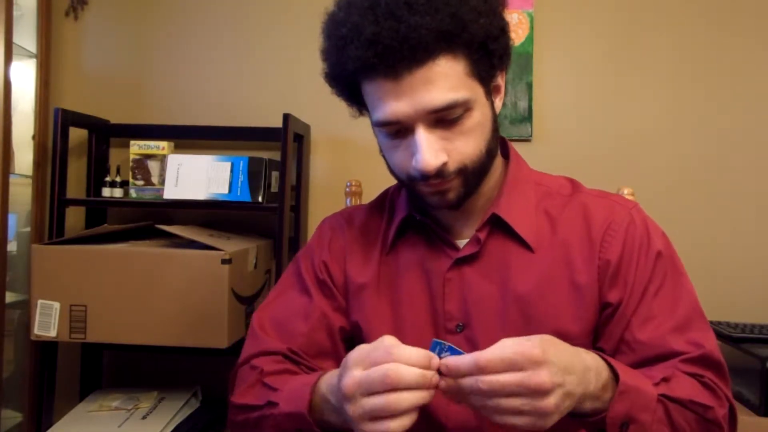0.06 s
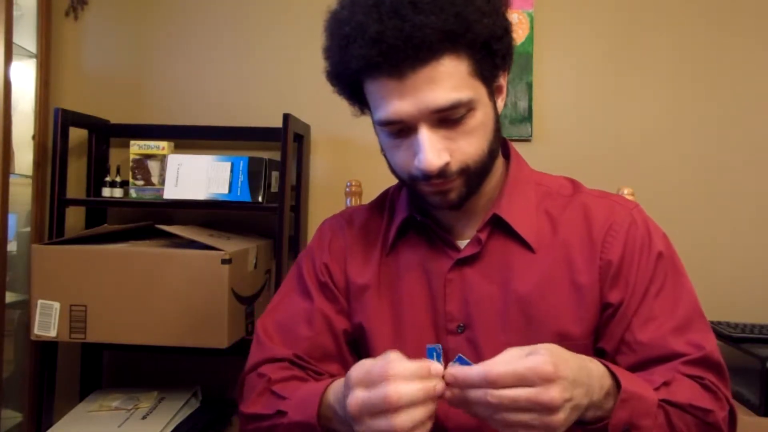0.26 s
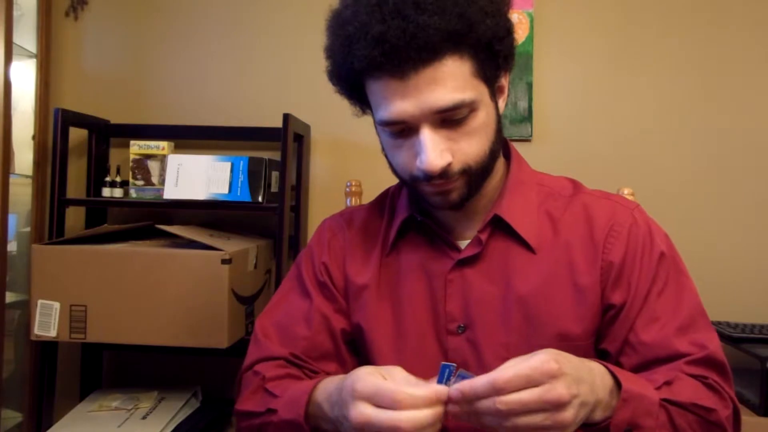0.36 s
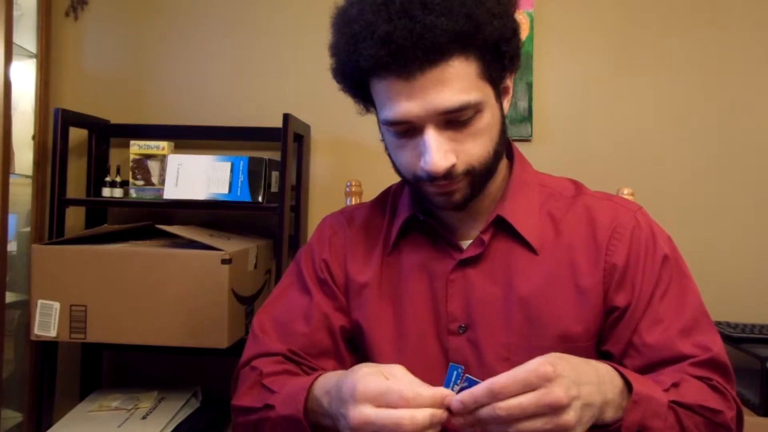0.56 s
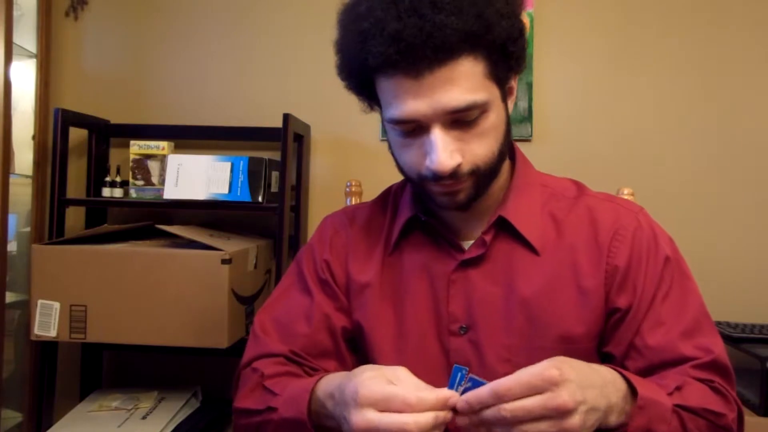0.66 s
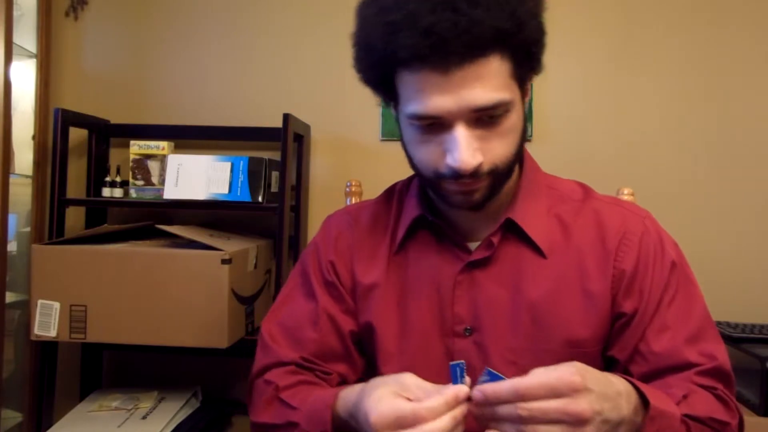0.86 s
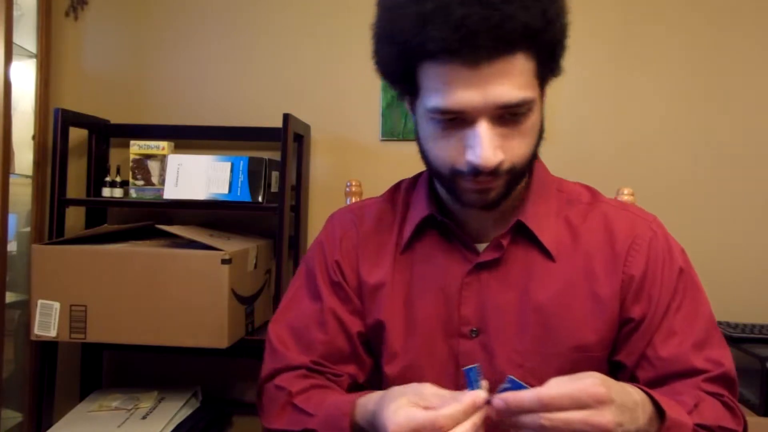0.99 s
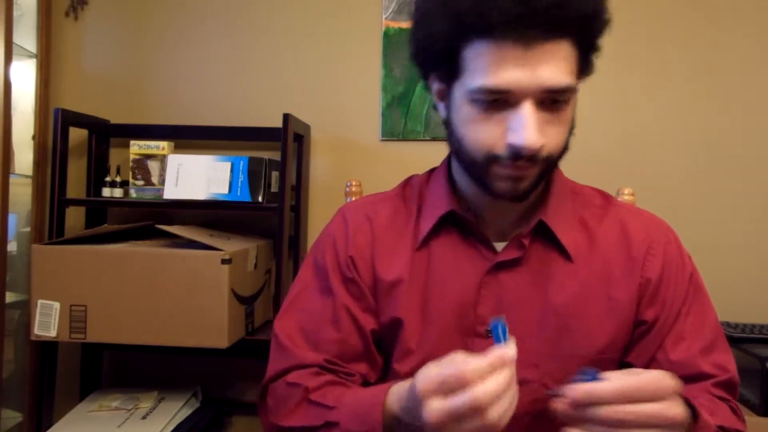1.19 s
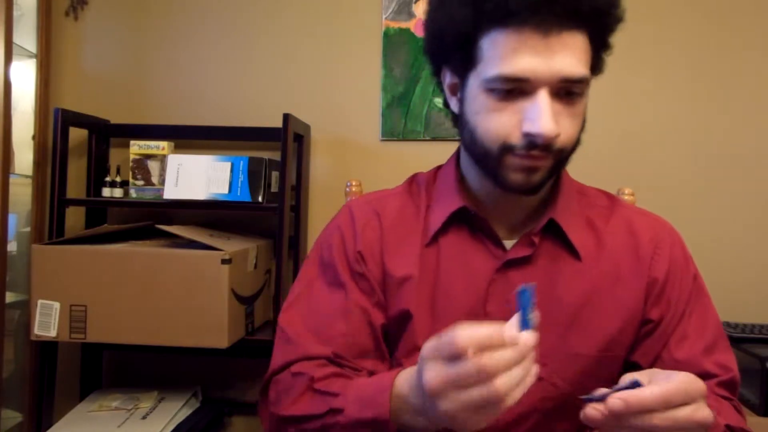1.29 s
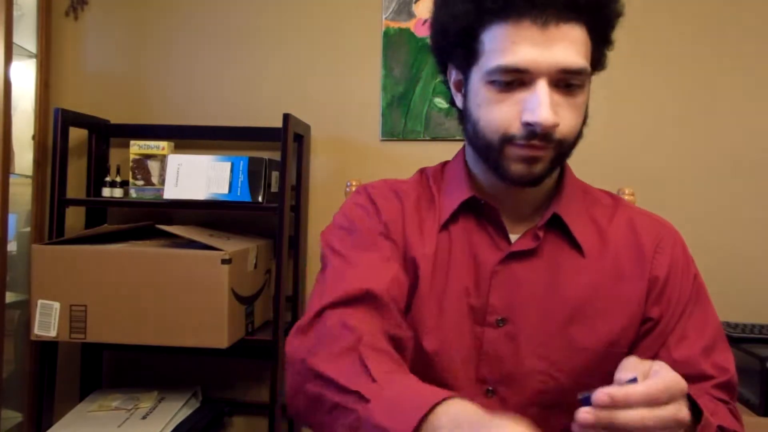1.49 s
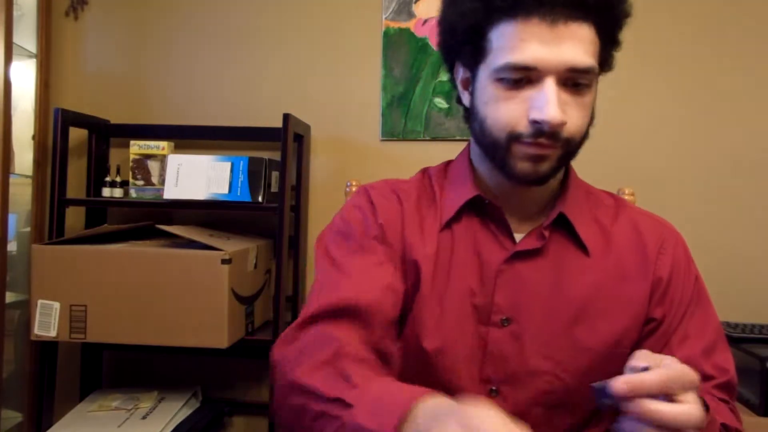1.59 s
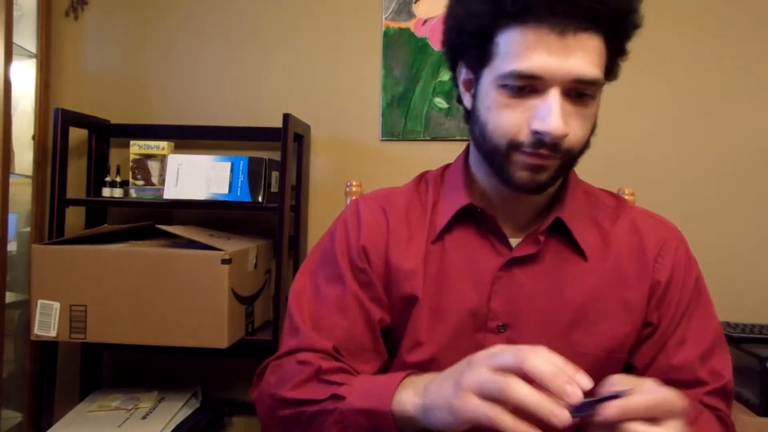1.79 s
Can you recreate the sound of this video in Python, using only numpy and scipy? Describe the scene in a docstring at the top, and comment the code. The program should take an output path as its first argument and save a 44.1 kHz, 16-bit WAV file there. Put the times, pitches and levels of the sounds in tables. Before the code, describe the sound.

One sharp paper snap, then two short crackly peels and a light put-down, quiet room

```python
"""A desk in a quiet room: small pieces of stiff paper are worked loose by hand, brighter in the right channel.
One piece snaps free loudly (ringing modes and early reflections); two short peels follow, each a run of cracks
(fibre bursts through three resonances) over tearing grains, and a piece is put down.
Fingers and sleeves rub (coloured grains under slow strokes), over a low hum and faint hiss (sines and noise)."""
import sys
import numpy as np
from scipy import signal
from scipy.fft import rfft, irfft
from scipy.io import wavfile
from scipy.ndimage import uniform_filter1d

SR = 44100
rng = np.random.default_rng(int(sys.argv[2]) if len(sys.argv) > 2 else 0)


def master(y):
    """Save y as 16-bit WAV."""
    cut = np.clip(np.atleast_2d(y).T, -1, 1)
    pcm = np.round(cut * 32767)  # scale
    wavfile.write(sys.argv[1], SR, pcm.astype(np.int16))


N = 81585
HZ = np.fft.rfftfreq(2048, 1 / SR)  # grid for colouring clicks


def amp(db):
    """Decibels to amplitude gain."""
    return 10 ** (np.asarray(db) / 20)


def unit(x):
    """Scales to rms 1."""
    return x / np.sqrt(np.mean(x ** 2) + 1e-20)


def read(points, hz):
    """Interpolates a table on a log-frequency axis."""
    f, value = np.transpose(points)
    return np.interp(np.log(hz + 1), np.log(f + 1), value)


def add(mix, start_s, sound):
    """Mixes a sound in at a time, cropped to the mix."""
    at = round(start_s * SR)
    sound = sound[max(-at, 0):]
    part = mix[max(at, 0):][:len(sound)]
    part += sound[:len(part)]


def click(gain):
    """Minimum-phase impulse with this magnitude spectrum."""
    both_sides = np.r_[gain, gain[-2:0:-1]]
    log_gain = np.log(np.maximum(both_sides, 1e-5))
    return np.fft.ifft(np.exp(np.conj(signal.hilbert(log_gain)))).real


def tint(x, points):
    """Filters causally by a (frequency [Hz], gain [dB]) table."""
    return signal.fftconvolve(x, click(amp(read(points, HZ))))[:len(x)]


def decorrelate(a, b, alike):
    """Two channels whose likeness is set per frequency."""
    return np.array([alike * a + np.sqrt(1 - alike ** 2) * b, a])


def ring(modes):
    """Dying sines with a very quick rise; high modes arrive first, neighbours swing opposite ways."""
    rise_s, treble_lead_s = 0.00023, 0.000405
    out = 0
    for k, (hz, db, t60_s) in enumerate(modes):
        delay_s = treble_lead_s * (1 - hz / 13000)
        t = np.maximum(np.arange(SR // 4) / SR - delay_s, 0)
        rise = 1 - np.exp(-(t / rise_s) ** 2)
        decay = amp(db - 60 * t / t60_s)
        out = out + (-1) ** k * rise * decay * np.sin(2 * np.pi * hz * t)
    return out


def fracture(scatter_s):
    """One main break and a quickly dying scatter of fibre breaks, evened out in colour."""
    scatter_db = 6  # all fibres together against the main break
    t = np.arange(400) / SR
    envelope = np.exp(-t / scatter_s) * (1 - np.exp(-2 * t / scatter_s))
    fibres = rng.standard_normal(len(t)) * envelope
    push = amp(scatter_db) * fibres / np.linalg.norm(fibres)
    push[0] = 1
    power = uniform_filter1d(abs(rfft(push, 2048)) ** 2, size=50)
    return np.convolve(push, click(1 / np.sqrt(power)))[:len(t)]


def friction(strokes, colour, grains_per_s=6000):
    """Dense grains of uneven size under strokes that swell and fade."""
    spread_db = 2
    sizes = amp(spread_db * np.minimum(rng.exponential(1, N), 4))
    hits = rng.random(N) < grains_per_s / SR
    grains = sizes * rng.standard_normal(N) * hits
    t = np.arange(N) / SR
    pressure = sum(amp(db) * np.sin(np.pi * np.clip((t - start_s) / length_s, 0, 1))
                   for start_s, length_s, db in strokes)
    return pressure * unit(tint(unit(grains), colour))


def air():
    """Room rumble and broadband hiss: shaped noise, partly shared between the channels."""
    # (frequency [Hz], relative density [dB])
    floor_colour = [(8.8, -54), (15, 10.5), (46, -8), (91, -9), (339, -16), (403, -16.5), (601, -18.5),
                    (898, -22), (978, -20.5), (1270, -23), (1380, -25), (1500, -24), (1780, -25),
                    (4460, -28), (14000, -32)]
    # (frequency [Hz], left-right likeness [0-1])
    floor_alike = [(30, 0.78), (120, 0.61), (500, 0.42), (1500, 0.27), (5000, 0.067), (14000, 0.038)]
    level_db, left_db = -56, 0.03
    hz = np.fft.rfftfreq(N, 1 / SR)
    a, b = rfft(rng.standard_normal((2, N)))
    alike = np.clip(read(floor_alike, hz), 0, 1)
    noise = irfft(decorrelate(a, b, alike) * amp(read(floor_colour, hz)), N)
    return amp(level_db) * unit(noise) * np.array([[amp(left_db)], [1]])


def hum():
    """Appliance hum: steady sines, each with its own slow level waver, equal in both channels."""
    # (frequency [Hz], rms level [dB])
    hum_lines = [(60, -69), (238, -73.5), (329, -78), (357, -71.5), (542, -81.5)]
    waver_depth, waver_hz = 0.47, 5
    hz, t = np.fft.rfftfreq(N, 1 / SR), np.arange(N) / SR
    out = 0
    for line_hz, db in hum_lines:
        slow_noise = rfft(rng.standard_normal(N)) * np.exp(-(hz / waver_hz) ** 2)
        waver = unit(irfft(slow_noise, N))
        tone = np.sin(2 * np.pi * (line_hz * t + rng.random()))
        out = out + amp(db) * unit((1 + waver_depth * waver) * tone)
    return out


def hiss():
    """Microphone hiss in a narrow band, independent in each channel."""
    centre_hz, width_hz, level_db = 13230, 760, -72.5
    hz = np.fft.rfftfreq(N, 1 / SR)
    band = np.exp(-((hz - centre_hz) / width_hz) ** 2)
    return amp(level_db) * unit(irfft(rfft(rng.standard_normal((2, N))) * band, N))


def room(x):
    """Quick reflections from desk and body, then a short furnished-room tail, more alike in the bass."""
    # (frequency [Hz], late decay T60 [s])
    late_t60 = [(200, .3), (600, 0.27), (1500, 0.36), (4700, 0.34), (8000, 0.15), (14000, .17)]
    # (frequency [Hz], gain [dB])
    tail_colour = [(150, -20.5), (580, -3), (850, -3), (1300, -7.5), (2700, -3), (4500, -10), (5400, -9.5),
                   (7200, -6.5), (10000, -5), (12000, -15.5), (14000, -9)]
    gap_s, early_t60_s, early_db = .0035, 0.13, 3
    alike_low, alike_high = 0.69, 0.53  # at 500 and 4000 Hz
    hz, t, (a, b) = signal.stft(rng.standard_normal((2, SR // 2)), SR, nperseg=256)
    alike = np.clip(read([(500, alike_low), (4000, alike_high)], hz), 0, 1)[:, None]
    late = amp(-60 * t / read(late_t60, hz)[:, None])
    early = amp(-60 * t / early_t60_s)
    fade = np.hypot(late, 2 * amp(early_db) * early)
    fade /= np.sqrt((fade ** 2).sum(1, keepdims=True) * t[1] * SR)  # same energy in every band
    tails = signal.istft(decorrelate(a, b, alike) * fade, SR, nperseg=256)[1]
    out = np.zeros((2, N))
    for channel, tail in zip(out, tails):
        add(channel, gap_s, signal.fftconvolve(x, tint(tail, tail_colour)))
    return out


def sleeves():
    """Shirt sleeves shifting: dull cloth friction."""
    # (start [s], length [s], level [dB])
    sleeve_strokes = [(-.08, 0.27, -59), (1.24, 0.3, -67.5), (1.56, 0.11, -59.5)]
    # (frequency [Hz], gain [dB])
    sleeve_colour = [(50, -17), (150, 7), (400, -7), (800, -8), (1500, -13), (4000, -19), (12000, -13)]
    return friction(sleeve_strokes, sleeve_colour)


def finger_rubs():
    """Fingertips sliding on paper: bright friction."""
    # (start [s], length [s], level [dB])
    rub_strokes = [(0, 0.48, -54.5), (.39, 0.14, -58), (.55, .12, -59.5), (.97, .11, -56.5),
                   (1.13, 0.18, -55.5), (1.41, .13, -54.5), (1.545, 0.055, -54.5), (1.62, 0.14, -52.5)]
    # (frequency [Hz], gain [dB])
    rub_colour = [(300, 5.5), (1500, -7.5), (3500, -8), (5500, 2), (7000, -5), (9000, -8), (11500, 2),
                  (14500, 5.5)]
    return friction(rub_strokes, rub_colour)


def set_down():
    """The piece settles on the desk: one short scrape."""
    # (start [s], length [s], level [dB])
    desk_strokes = [(1.644, 0.021, -53)]
    # (frequency [Hz], gain [dB])
    desk_colour = [(80, -8), (220, 4), (900, 5), (2000, 1), (3000, -25), (3900, 4), (6000, -13),
                   (13000, -11)]
    return friction(desk_strokes, desk_colour)


def peels():
    """Fibres tearing between the cracks: sparser, brighter grains."""
    # (start [s], length [s], level [dB])
    peel_strokes = [(.917, 0.043, -45.5), (.949, 0.018, -43), (1.199, .012, -45.5), (1.229, 0.012, -41.5)]
    # (frequency [Hz], gain [dB])
    peel_colour = [(300, -27), (1800, -14), (3500, -5), (5500, 2), (7500, 2), (9000, -8), (12000, 13),
                   (14500, -9.5)]
    return friction(peel_strokes, peel_colour, grains_per_s=2400)


def knocks():
    """The card knocks dully against fingers or desk, ringing a few low modes."""
    # (time [s], level [dB])
    knock_hits = [(.2016, -42), (.9139, -42.5), (.9264, -44.5), (.9408, -53), (0.9597, -56), (1.2049, -49),
                  (1.2325, -46), (1.6469, -43.5)]
    # (frequency [Hz], relative level [dB], T60 [s])
    knock_modes = [(232, -9, 0.034), (515, 3.5, 0.0095), (678, -0.5, 0.018)]
    out = np.zeros(N)
    for start_s, db in knock_hits:
        add(out, start_s, amp(db) * ring(knock_modes))
    return out


def cracks():
    """Each crack's fibre burst excites three broad resonances that shift with the grip."""
    # (time [s], scatter [s], body [Hz], body [dB], ring [Hz], ring [dB], top [Hz], top [dB])
    crack_events = [(0.177, .0008, 1880, -27, 5550, -29, 12500, -23),
                    (0.403, 0.00073, 1900, -33, 4850, -25.5, 12200, -29),
                    (0.9138, .0004, 1590, -14, 6130, -3.5, 12000, -9.5),
                    (0.9261, 0.00068, 1940, -11.5, 6800, -4.5, 11700, -10),
                    (0.9399, 0.00081, 1900, -14.5, 6760, -5, 12200, -4),
                    (0.956, .0007, 1900, -30, 6660, -14, 11300, -12),
                    (0.9604, 0.00031, 1770, -10.5, 6450, 3, 12500, 0),
                    (.9674, 0.00022, 1900, -28, 7000, -29, 12100, -11),
                    (0.9987, 0.0018, 1900, -40, 6500, -31, 12800, -17.5),
                    (1.044, 0.0014, 1900, -42, 6500, -34, 12600, -28),
                    (1.1525, 0.00035, 1910, -46, 5960, -38, 12000, -26),
                    (1.1882, 0.0014, 1900, -46, 5960, -27, 12500, -24),
                    (1.2049, 0.00015, 2220, -11, 4400, -15, 12500, -2),
                    (1.2323, 0.00053, 1660, -8, 5400, -15, 13400, -8),
                    (1.2382, 0.00075, 1530, -15, 4600, -7.5, 12700, -12),
                    (1.241, 0.00014, 1400, -13.5, 4600, -26, 11900, -8.5),
                    (1.3260, 0.00091, 1900, -33, 5500, -36, 13200, -24),
                    (1.3450, 0.00064, 1900, -49, 6100, -30.5, 12500, -22.5),
                    (1.6330, 0.00033, 2000, -47, 6000, -18, 12100, -18.5),
                    (1.647, 0.00061, 2400, -12, 4170, -19, 9250, -9)]
    body_octaves, ring_octaves, top_octaves = 0.3, 0.29, 0.24
    floor_db = -14  # broadband share, relative to the body
    out = np.zeros(N)
    for start_s, scatter_s, body_hz, body_db, ring_hz, ring_db, top_hz, top_db in crack_events:
        gain = amp(body_db + floor_db)
        for hz, db, width_octaves in [(body_hz, body_db, body_octaves),
                                      (ring_hz, ring_db, ring_octaves),
                                      (top_hz, top_db, top_octaves)]:
            offset = np.log2((HZ + 1) / hz) / width_octaves
            gain = gain + amp(db) / (1 + offset ** 2 / 2) ** 2
        add(out, start_s, np.convolve(fracture(scatter_s), click(gain)))
    return out


def snap():
    """The card lets go in one pulse; early reflections of it, inverted, follow. Gives (direct, room send)."""
    # modes of the snapping card: (frequency [Hz], relative level [dB], T60 [s])
    card_modes = [(1290, -21.5, 0.0039), (3430, -19.5, 0.0066), (4480, -10, 0.0042), (5370, -5, 0.0034),
                  (8710, -10, 0.0028), (11660, -5, 0.0034), (12700, 2.5, 0.0028)]
    # faint ringing that outlasts the snap: (frequency [Hz], relative level [dB], T60 [s])
    after_ring = [(4680, -53, 0.18), (5330, -45, .16), (5800, -57, .2)]
    # early reflections: (delay after the snap [s], relative level [dB])
    reflections = [(.00125, -3), (.00277, -8.5), (0.0103, -18)]
    # (frequency [Hz], gain [dB])
    reflection_colour = [(400, -7), (1700, -1.5), (3500, -6), (5200, -3), (7500, 5), (9000, -25),
                         (12500, -10), (14000, 6.5)]
    # colouring of the snap by the nearby desk: (frequency [Hz], gain [dB])
    desk_comb_colour = [(150, -2.5), (400, -9), (550, 3), (880, -9), (1280, 1), (1900, 3.5), (2300, 1.5),
                        (3450, 0.5), (3950, -0.5), (5000, 1), (14000, -0.5)]
    start_s, level_db, room_db = .2013, 0.5, -2
    scatter_s, fizz_db, splinter_db = 0.00066, -1, 3.5
    direct, sent, pulse = np.zeros(N), np.zeros(N), ring(card_modes)
    add(direct, start_s, pulse + ring(after_ring))
    for delay_s, db in reflections:
        add(direct, start_s + delay_s, -amp(db) * tint(pulse, reflection_colour))
        add(direct, start_s + delay_s, amp(db + fizz_db) * fracture(scatter_s))
    add(sent, start_s, pulse)
    add(sent, start_s, amp(splinter_db) * fracture(scatter_s))
    direct, sent = tint(direct, desk_comb_colour), tint(sent, desk_comb_colour)
    return amp(level_db) * np.array([direct, amp(room_db) * sent])


def scene():
    """The hands are nearer the right microphone; the left one hears them duller."""
    # left microphone against right: (frequency [Hz], gain [dB])
    left_colour = [(300, 1), (1000, 2), (2500, -0.5), (5000, -4), (6500, -6), (8500, -8), (13000, -14.5)]
    crack_room_db, friction_room_db = -2.5, 2
    rubbing = sleeves() + finger_rubs() + set_down() + peels()
    cracking = cracks() + knocks()
    snap_direct, snap_sent = snap()
    direct = snap_direct + cracking + rubbing
    sent = snap_sent + amp(crack_room_db) * cracking + amp(friction_room_db) * rubbing
    left, right = direct + room(sent)
    return np.array([tint(left, left_colour), right]) + air() + hum() + hiss()


def record(dry):
    """A soft limit keeps the loudest peak in range; then the treble rolls off up to the band limit."""
    # (frequency [Hz], gain [dB])
    roll_off = [(13800, 0), (14150, -3), (14450, -26), (16000, -36)]
    headroom, edge_hz = .85, 16000
    held = dry / (1 + (dry / headroom) ** 6) ** (1 / 6)
    gain = amp(read(roll_off, np.fft.rfftfreq(2 * N, 1 / SR)))
    dull = irfft(rfft(held, 2 * N) * gain)[:, :N]
    lowpass = signal.firwin(255, edge_hz, window=("kaiser", 8), fs=SR)
    return signal.oaconvolve(dull, lowpass[None], "same")


dry = scene()
out = record(dry)
master(out)
```